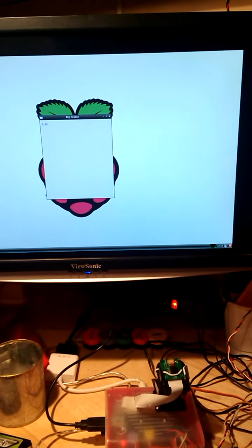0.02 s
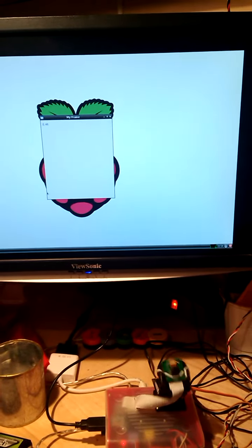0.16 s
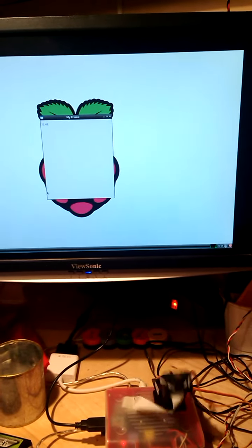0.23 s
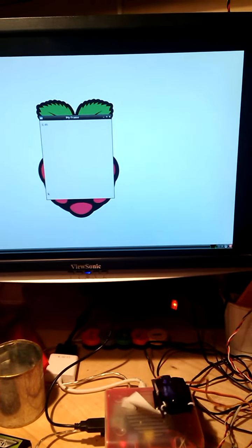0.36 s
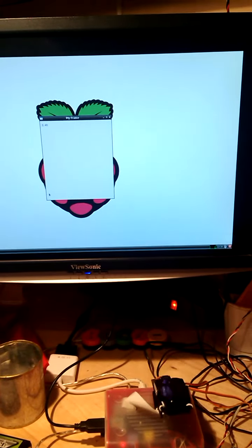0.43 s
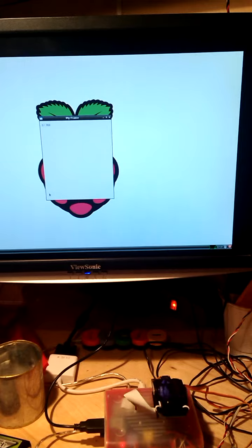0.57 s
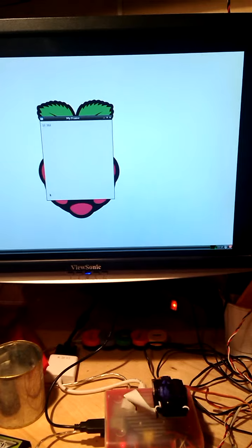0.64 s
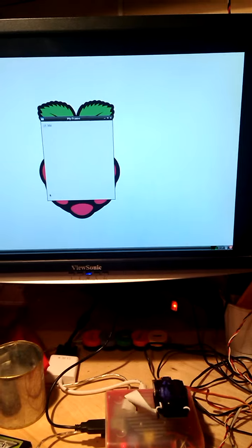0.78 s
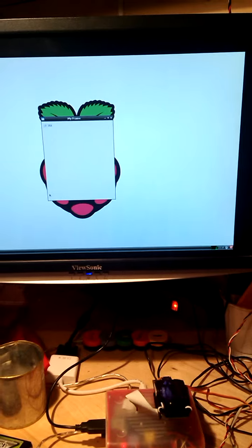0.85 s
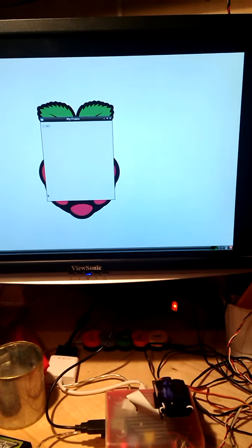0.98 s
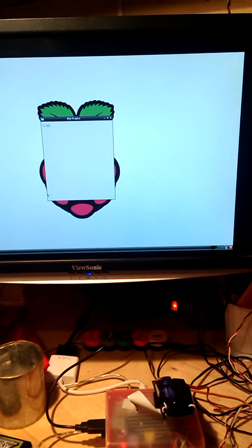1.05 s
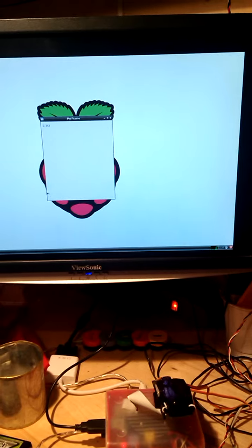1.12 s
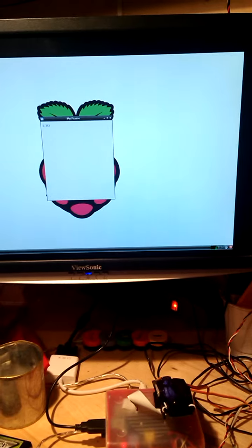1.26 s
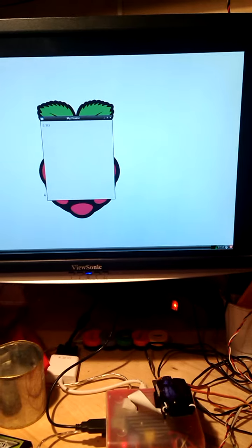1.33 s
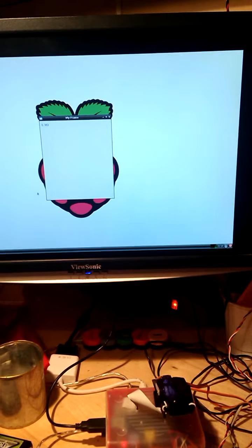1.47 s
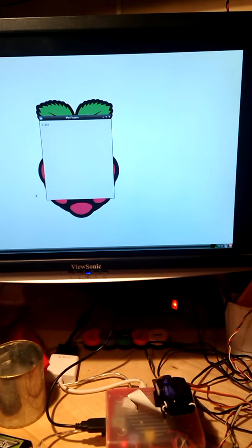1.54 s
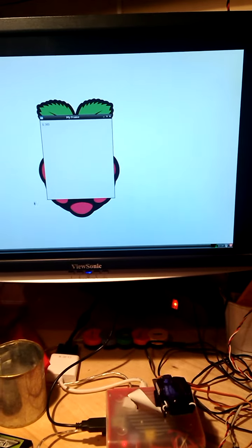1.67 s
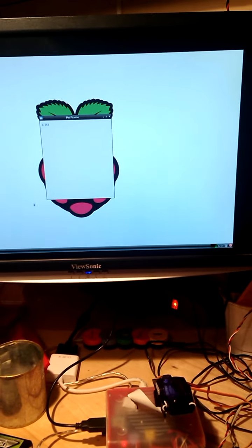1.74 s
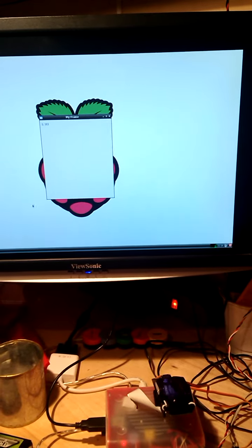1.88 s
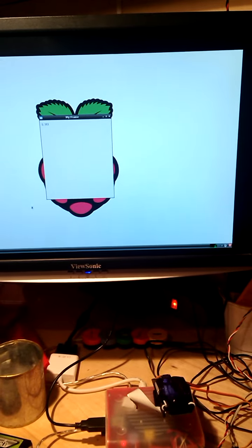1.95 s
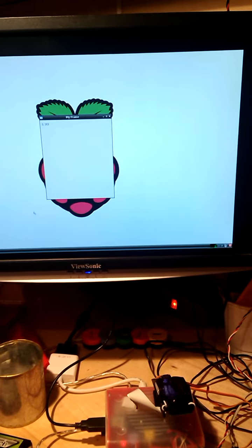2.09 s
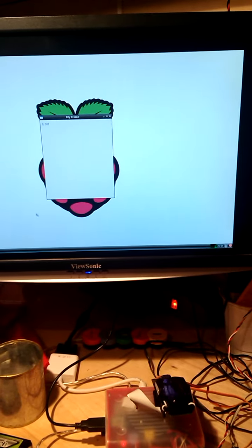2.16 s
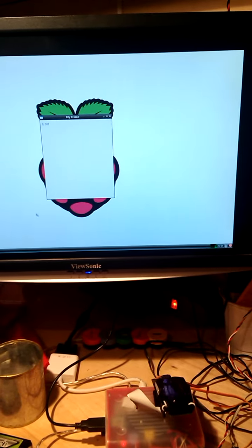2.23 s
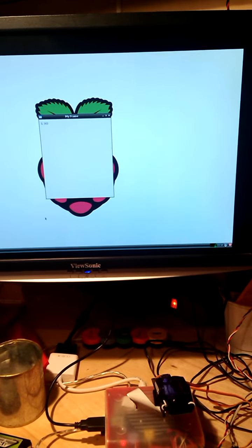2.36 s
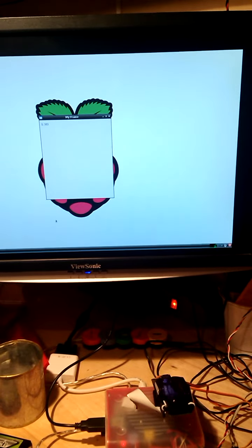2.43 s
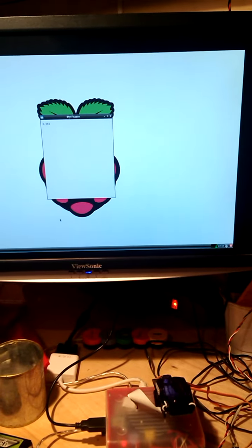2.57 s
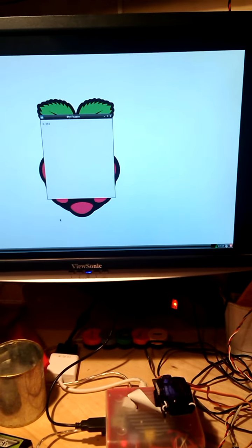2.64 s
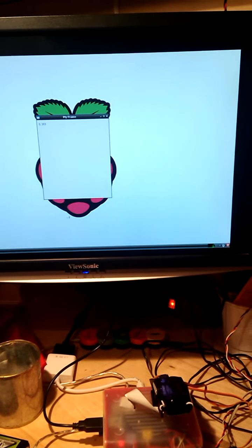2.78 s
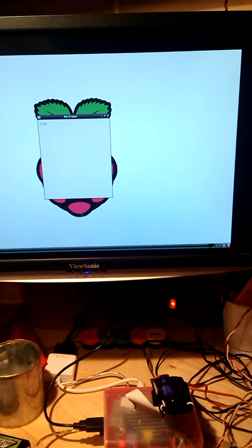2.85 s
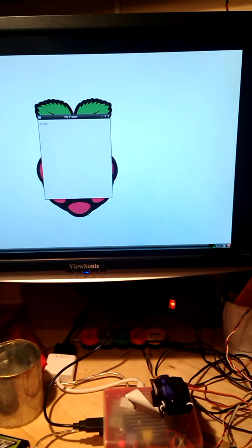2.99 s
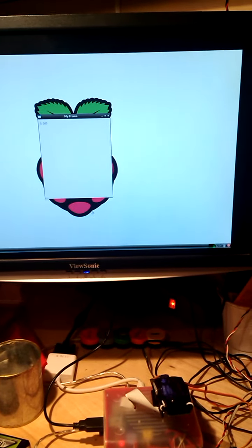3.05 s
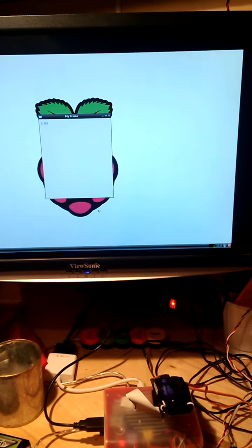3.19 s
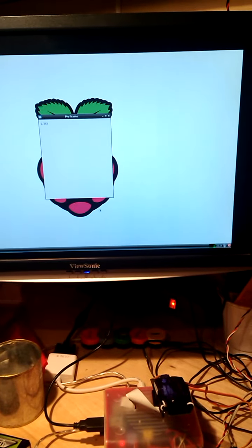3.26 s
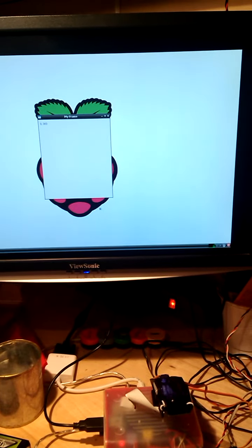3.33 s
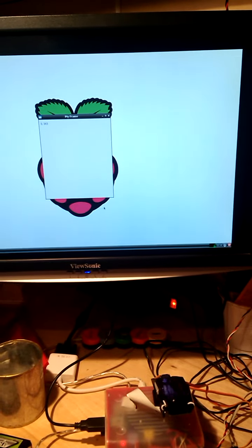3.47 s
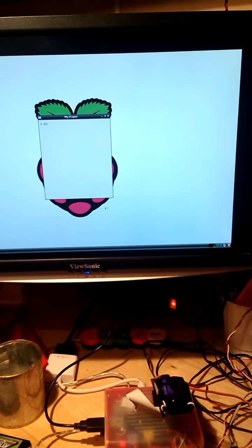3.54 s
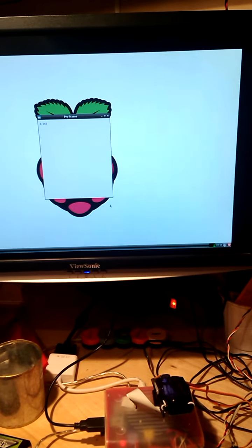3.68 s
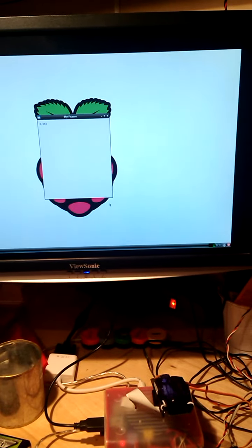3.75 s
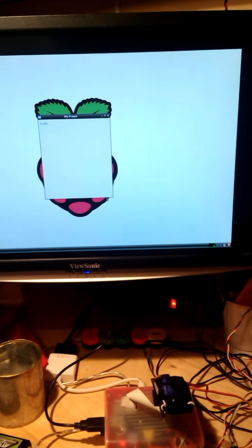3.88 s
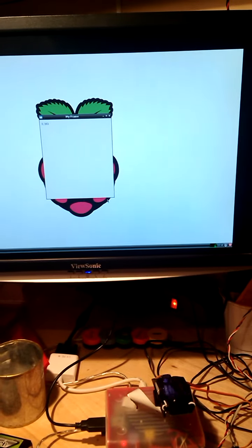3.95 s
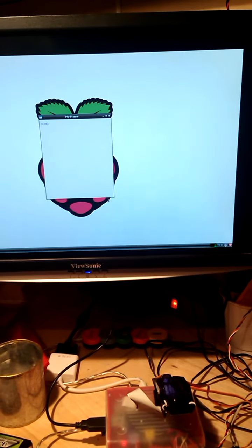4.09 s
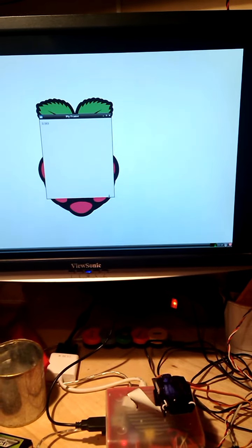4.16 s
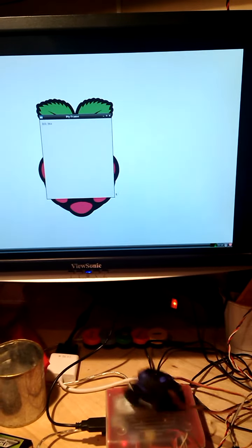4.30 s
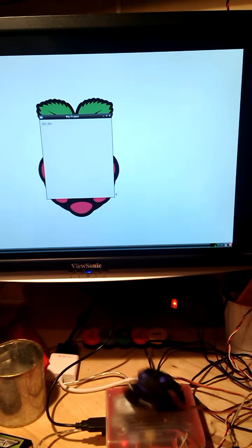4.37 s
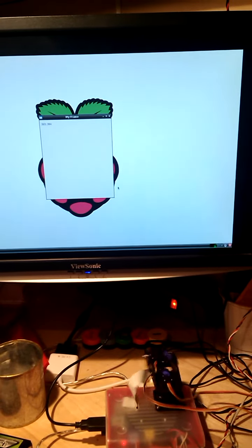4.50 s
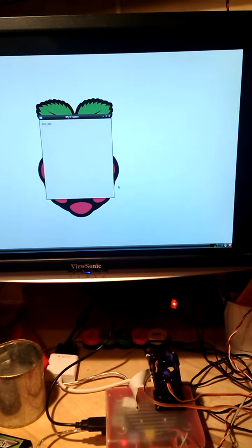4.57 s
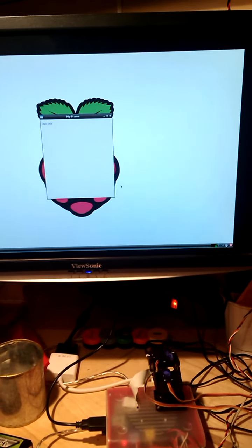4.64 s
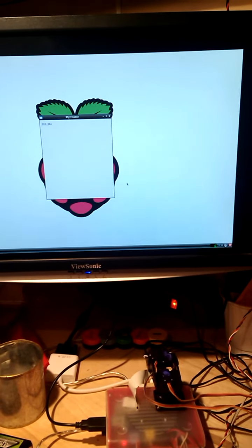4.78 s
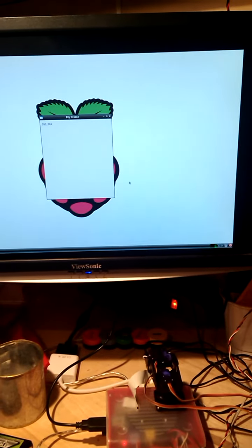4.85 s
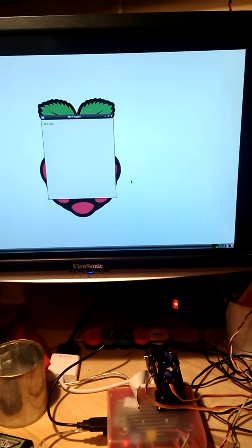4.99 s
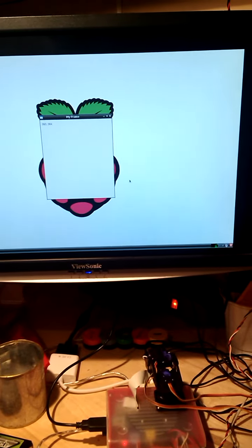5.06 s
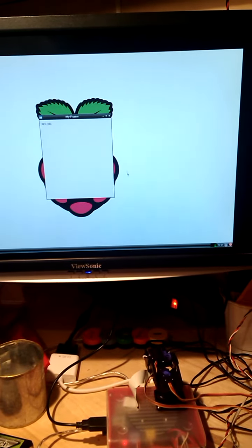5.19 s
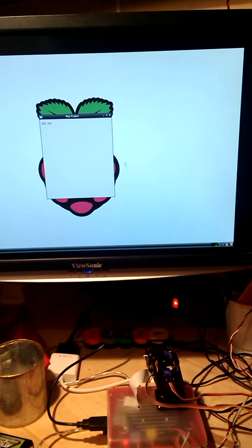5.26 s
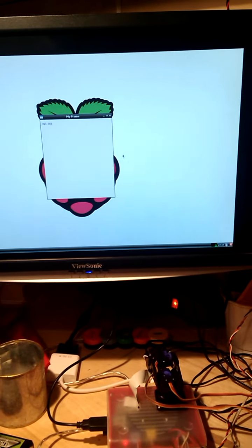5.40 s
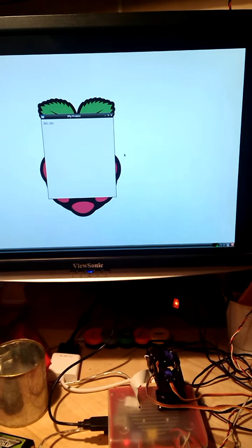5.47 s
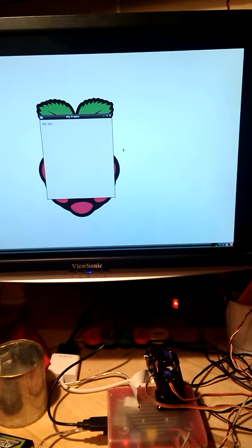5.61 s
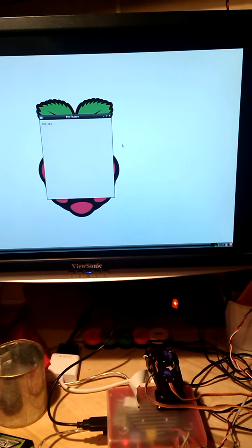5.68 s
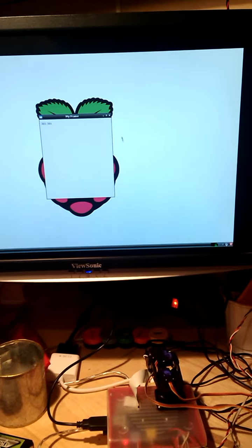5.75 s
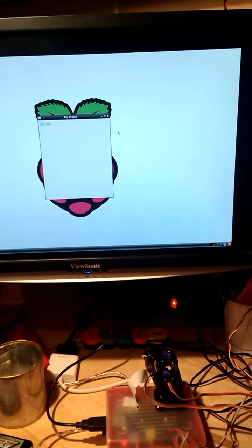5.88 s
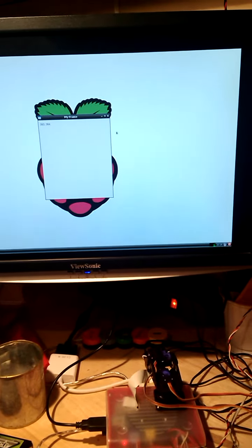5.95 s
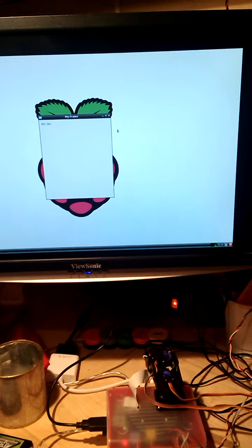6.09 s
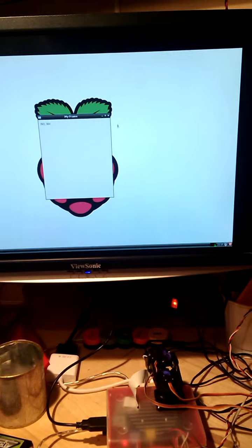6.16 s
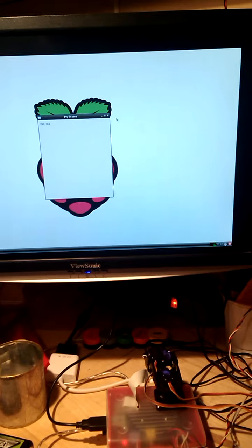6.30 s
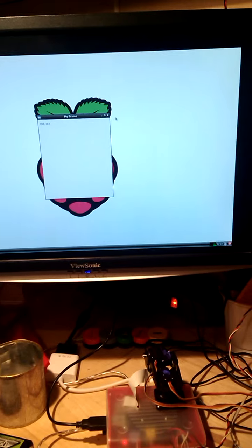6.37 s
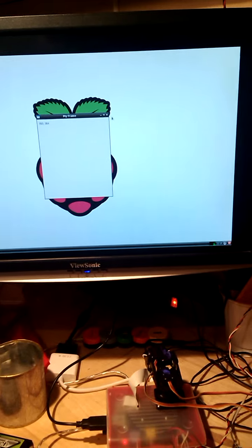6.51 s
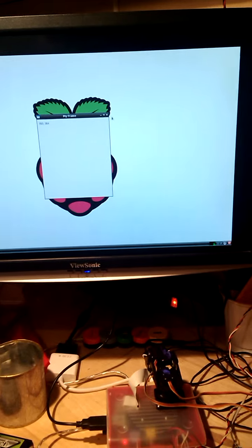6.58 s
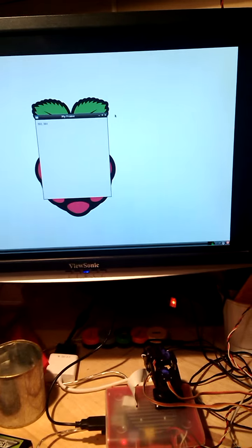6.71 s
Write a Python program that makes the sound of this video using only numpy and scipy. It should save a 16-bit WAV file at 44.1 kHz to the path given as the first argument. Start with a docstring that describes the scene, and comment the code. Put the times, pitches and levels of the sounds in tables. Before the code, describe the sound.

Close to a desk in a small damped room, steady microphone hiss opens alone. A small servo rasps briefly with chattering plastic gears, then ticks and twitches weakly. Faint sliding and a cluster of hollow knocks follow, then one sharp loud knock. A second servo run bursts out louder and harsher, twitches in turn, and a few separate knocks finish.

```python
"""A desk top in a small damped room, a hissing microphone close by: the hiss comes first and never stops.
From 0.24 s a small plastic-geared servo swings a bracket: teeth chatter in the case, the motor whines, the base thumps.
It then hunts for its position in short twitches; from 1.3 s something hard and hollow is slid, knocked and set
down, noise and sharp pushes ringing the desk. At 4.3 s a second servo makes a harder run and hunts in its turn.
A few last knocks and faint slides on the desk close the take."""
import sys
import numpy as np
from scipy import signal
from scipy.fft import rfft, irfft, next_fast_len
from scipy.io import wavfile
from scipy.ndimage import uniform_filter1d, map_coordinates

SR = 44100
rng = np.random.default_rng(int(sys.argv[2]) if len(sys.argv) > 2 else 0)


def wav_record(signal):
    """Record a signal, one row per channel, as 16-bit PCM in the file named by sys.argv[1]."""
    frames = np.transpose(np.atleast_2d(signal))
    bounded = np.clip(frames, -1, 1)
    # unit amplitude maps onto the largest positive 16-bit level
    quanta = np.round(bounded * 32767).astype(np.int16)
    wavfile.write(sys.argv[1], SR, quanta)


N = 296777

# Levels in the tables are relative: most sources add a fixed gain of their own further down.
# room and microphone noise: (f/Hz, density level/dB)
HISS = [(12, -26.5), (20, -16.5), (22, -9.5), (43, -22.5), (113, -18.5), (146, -30), (210, -22.5),
        (270, -28), (410, -24), (558, -31.5), (607, -29.5), (1150, -30.5), (1610, -34), (5380, -38.5),
        (16000, -42.5)]
HISS_DB = -56  # rms level
# the two full runs: (t/s, whirr level/dB, dull side of the case level/dB re whirr, treble lift/dB)
RUNS = [
    [(.242, -54, -4, 0), (.25, -25.5, -9, 7), (.264, -21.5, -15, 11), (.36, -19, -15.5, 9.5),
     (.43, -15, -15.5, 6.5), (.46, -13.5, -22, 3), (.478, -19.5, -13, 1), (.51, -45, 0.5, -4)],
    [(4.293, -40.5, -9, -6.5), (4.302, -17.5, -5.5, -1.5), (4.36, -13.5, -7, 3), (4.41, -16.5, -3, 8.5),
     (4.445, -24.5, -7, 11), (4.46, -15.5, -10, 4.5), (4.534, -12, -17, 2.5), (4.6, -20.5, -8, 3.5),
     (4.626, -31.5, -6, 4), (4.645, -22, -2, 7.5), (4.675, -46, -11, 0)],
]
# motor spells: (power on t/s, power off t/s, top speed f/Hz in turns, commutator whine level/dB)
MOTOR_SPELLS = [(0.244, 0.459, 112, -64), (4.293, 4.565, 103.2, -51)]
START_SHARE = .6  # speed at first sound over top speed
SPIN_UP_S, COAST_S = 0.031, 0.17  # time constants
WHINE_POWER = 4  # the whine grows as this power of speed
# take-ups of gear backlash, loud and faint: (t/s, peak level/dB)
JERKS = [(0.257, -19), (0.283, -9.5), (0.3285, -24.5), (0.367, -14), (0.403, -9), (0.4209, -17),
         (0.437, -13), (0.4667, -11), (0.4972, -22), (0.518, -24), (0.587, -22), (0.607, -15.5),
         (0.6264, -23), (0.6458, -29), (0.656, -19), (0.6978, -27.5), (0.7176, -29), (0.7566, -29),
         (0.838, -28.5), (0.862, -24.5), (0.897, -24.5), (0.911, -21.5), (0.9663, -23.5), (1.05, -32),
         (1.0969, -28), (1.1169, -24.5), (1.1357, -21.5), (1.166, -31), (1.1767, -23), (4.303, -3),
         (4.3166, -5), (4.3267, -5), (4.3479, -2.5), (4.3782, -1), (4.4058, -4), (4.465, -6.5), (4.485, -8),
         (4.5106, -3), (4.5323, -6), (4.559, -6.5), (4.594, -13), (4.6078, -18), (4.637, -19),
         (4.6738, -31), (4.688, -23), (4.7183, -29.5), (4.7562, -28), (4.7779, -22.5), (4.8163, -21.5),
         (4.8265, -22), (4.8754, -37), (4.887, -36), (4.958, -25.5), (4.9723, -28)]
JERK_T60_S, TICK_T60_S = 0.034, .008
TURN_JOLT_DB, TURN_SCATTER_DB = -2.5, 1.5  # one more take-up each shaft turn, re whirr; its spread
# resonances of the case: (f/Hz, width/Hz, level/dB over the case colour)
CASE_MODES = [(4540, 170, -0.5), (5030, 100, 0.5), (5700, 102.8, 4.5), (6150, 240, 1), (6530, 420, 0.5),
              (6900, 34, 3), (7120, 59, -1.5), (8000, 60, -0.5), (8420, 120, -12), (9300, 200, -1)]
# two curves, the case of each servo radiating, first mover and second: (f/Hz, density level/dB)
CASE_COLOURS = [(2120, -41), (3600, 5), (3810, -6), (4540, -14.5), (5140, -12), (5430, -9), (5860, -11.5),
                (6350, -4), (7150, -2.5), (8150, -10.5), (9650, -13.5), (10800, -23.5), (12200, -23),
                (14900, -26.5), (16000, -33)], [(2120, -55), (3600, -8.5), (3900, -13), (4830, -15.5),
                (5570, -6.5), (5930, -8.5), (6600, -1.5), (7520, -5), (8470, -9.5), (9960, -11),
                (10900, -20.5), (12000, -15), (13900, -18.5), (15400, -21.5), (16000, -26.5)]
SECOND_S = 3  # from here the second servo is the one moving
# ring of the output arm: (f/Hz, width/Hz, level/dB)
ARM = [(2505, 150, 0)]
# gears felt through the bracket: (f/Hz, density level/dB)
GROWL = [(150, -49.5), (250, -12), (387, -13), (511, -12), (568, -4.5), (734, 4), (959, 1), (1040, -5.5),
         (1140, -6.5), (1840, 1), (2070, 0), (3200, -8.5), (4160, -33.5), (7040, -120)]
GROWL_DB, GROWL_GROWS = -44.5, 0.78  # growl at a whirr of -19 dB; dB gained per dB of whirr
# short hunting twitches: (start t/s, length t/s, whirr level/dB)
TWITCHES = [(0.513, 0.06, -36.5), (.595, .03, -31.5), (0.637, 0.032, -35.5), (.696, .035, -47),
            (0.834, .08, -41.5), (0.969, 0.015, -33), (1.034, 0.036, -45), (1.096, 0.049, -43.5),
            (1.15, 0.02, -36.5), (4.672, 0.023, -36), (4.713, 0.018, -38.5), (4.772, 0.066, -36),
            (4.871, 0.053, -43.5), (4.96, 0.016, -36)]
TWITCH_RISE_S, TWITCH_T60_S, TWITCH_DULL_DB = .004, 0.087, -5.5
FIZZ_DB, FIZZ_GROWS = 4, .3  # lift of a twitch's treble at a whirr of -23 dB; dB gained per dB of whirr
# the bracket thumps its base: (t/s, peak level/dB)
THUMPS = [(0.265, -30), (0.47, -22.5), (4.38, -7.5), (4.419, -18), (4.61, -30), (4.704, -33.5)]
# the shaken base hums in swells: (middle t/s, half length t/s, f/Hz, glide/Hz per s, level/dB)
HUMS = [(0.309, 0.051, 92, 145, -54), (.4, 0.021, 150, 699, -60), (0.483, 0.019, 80, -300, -53),
        (4.438, 0.041, 97, 0.5, -54.5), (4.575, 0.016, 115, -2, -55)]
# resonances of the hollow base: (f/Hz, width/Hz, level/dB)
BASE = [(100, 110, -16), (304, 250, -19.5), (816, 88, 6), (890, 78, 3.5), (1070, 73, -12.5),
        (1440, 80, -4.5), (1740, 60, -7), (2130, 93, 0), (2540, 34, 0), (3000, 130, -11), (5300, 730, -8)]
# strokes of sliding over the desk: (middle t/s, half length t/s, level/dB, hiss level/dB re stroke)
SLIDES = [(1.302, 0.12, -60, -2.5), (2.173, 0.03, -58.5, 0), (2.294, 0.021, -51.5, -12),
          (2.351, .015, -43.5, -13), (2.4, 0.013, -43.5, -9), (2.429, 0.015, -39.5, -6.5),
          (2.601, 0.034, -60.5, 2), (2.8, 0.19, -66, 1.5), (3.185, 0.026, -65, -4),
          (3.353, 0.043, -60, -2.5), (3.573, .04, -61, -4), (5.093, 0.029, -56.5, -3),
          (5.48, 0.061, -60, 1), (6.112, .04, -66.5, -1), (6.38, .06, -67, 0)]
# resonances of the desk: (f/Hz, width/Hz, level/dB)
DESK = [(89.5, 150, -14.5), (225, 34, -5), (373, 50, 2.5), (589, 86, -8.5), (938, 145, -2), (1156, 110, 1),
        (1386, 100, 2.5), (1462, 150, 1.5), (1594, 69, -4), (1694, 99.2, -8.5), (1866, 118, -1.5),
        (2214, 120, -7.5), (2560, 210, -10), (3480, 200, -1), (4170, 740, -6), (4660, 220, -2),
        (5300, 270, -0.5), (5925, 250, 1), (6640, 200, -0.5), (7620, 500, -13), (8540, 500, -10),
        (10200, 1700, -20.5), (13500, 3000, -38)]
# where the desk's boom, hollow, body and tick lie: (low f/Hz, high f/Hz)
DESK_BANDS = [(0, 700), (700, 1300), (1300, 3000), (3000, SR)]
# knocks on the desk: (t/s, peak level/dB, then level/dB re peak: boom, hollow, tick, first strike)
KNOCKS = [(2.2907, -31, -16, -2, -12, 1.5), (2.3382, -27.5, -15, -5, -16, -2),
          (2.379, -33, -21, -11, -16, 1), (2.4006, -40, -20, -6, -8, 2), (2.4198, -24.5, -12, 1, -10, -11),
          (2.527, -37, -4, -1, -22, -3), (2.538, -18, -9.5, -2.5, -5.5, -12), (2.542, -24, -4, 8.5, -6, 1),
          (3.813, -5.5, -15.5, -6.5, -11, 2.5), (3.821, -30.5, -18, -21, -23, -7),
          (3.911, -33.5, -11, -10, -22, -5), (3.967, -36, 4, -2, -10, 3), (3.9747, -44.5, 1.5, 8.5, -9, -1),
          (4.0323, -35.5, 1, 5, -11, -3), (4.0372, -33.5, -10, -0.5, -7, -8),
          (5.3176, -12.5, -10.5, -4, -16.5, 3.5), (5.4172, -25, -6, -2, -10, -1),
          (5.422, -34.5, -20, 5, -5, -7), (5.9596, -25, -1.5, 3.5, -16, -1),
          (6.0011, -19.5, -10, -7, -10.5, -4.5), (6.0078, -36, -11, 2.5, -20, 9.5)]
CHATTER_T60_S = 0.048
# first clack of the knocked shell: (f/Hz, width/Hz, level/dB)
CLACK = [(1560, 360, 3.5)]
# decay of the room: (f/Hz, t60/s)
ROOM = [(200, 0.33), (600, 0.14), (1500, .14), (5000, .13), (12000, .09)]
TOP_HZ, OFFSET = 15900, -.0094  # band limit; steady offset, full scale 1


def amp(db):
    """Gain of a level in dB."""
    return 10 ** (np.asarray(db) / 20)


def unit(x):
    """Scaled to rms 1."""
    return x / np.sqrt(np.mean(x ** 2) + 1e-20)


def along(points, hz):
    """(Hz, value) points read on a log axis."""
    f, v = np.transpose(points)
    return np.interp(np.log(hz + 1), np.log(f + 1), v)


def curves(tables):
    """One value per sample for each column, and a mask that is 1 while a table lasts."""
    s, *cols = np.transpose(np.vstack(tables))
    t = np.arange(N) / SR
    on = sum((t >= rows[0][0]) & (t < rows[-1][0]) for rows in tables) > 0
    return [np.interp(t, s, c) for c in cols], uniform_filter1d(on * 1., size=100)


def filtered(x, response):
    """x times a response of frequency."""
    m = next_fast_len(N + SR // 2)
    return irfft(rfft(x, m) * response(np.fft.rfftfreq(m, 1 / SR)), m)[..., :N]


def ringing(modes):
    """Causal response of a set of resonances, alternating in sign."""
    def one(f, centre, width, db):
        return amp(db) * 1j * f * width / (centre * centre - f * f + 1j * f * width)
    return lambda f: sum((-1) ** k * one(f, *mode) for k, mode in enumerate(modes))


def wobble(rate):
    """A smooth random curve, rate knots a second."""
    knots = rng.standard_normal(int(N * rate / SR) + 4)
    return map_coordinates(knots, [np.arange(N) * rate / SR])


def swell(middle, half):
    """A bell-shaped rise and fall."""
    return np.exp(-.5 * ((np.arange(N) / SR - middle) / half) ** 2)


def contacts(clumps_per_s, spread_db):
    """Dense tiny impacts that come in harder and softer clumps."""
    return unit(rng.standard_normal(N) * amp(spread_db * wobble(clumps_per_s)))


def bursts(events, rise_s=0):
    """Envelope of (s, dB, t60) events: a quick start, then an exponential fall."""
    out, t = np.zeros(N + SR), np.arange(1, SR // 5) / SR
    rise = 1 - np.exp(-t / max(rise_s, 1e-6))
    for s, db, t60 in events:
        out[round(s * SR):][:len(t)] += amp(db - 60 * t / max(t60, .004)) * rise
    return out[:N]


def steady_hiss():
    """Room and microphone noise: steady random noise coloured by one spectrum."""
    return amp(HISS_DB) * unit(filtered(rng.standard_normal(N), lambda f: amp(along(HISS, f))))


def effort():
    """Whirr level of runs and twitches together, how much of the dull side shows, and the treble lift."""
    (run_db, dull_db, fizz_db), on = curves(RUNS)
    t, gain = np.arange(N) / SR, on * amp(run_db)
    for s, length, db in TWITCHES:
        rise = np.clip((t - s) / TWITCH_RISE_S, 0, 1)
        gain = gain + rise * amp(db - 60 * np.clip(t - s - length, 0, 1) / TWITCH_T60_S)
    whirr_db = 20 * np.log10(gain + 1e-9)
    twitch_fizz_db = FIZZ_DB + FIZZ_GROWS * (whirr_db + 23)
    under_db = on * dull_db + (1 - on) * TWITCH_DULL_DB
    return whirr_db, under_db, on * fizz_db + (1 - on) * twitch_fizz_db


def shaft():
    """The motor spins up, holds, and coasts down: turns a second and whine gain."""
    t, turns_hz, whine = np.arange(N) / SR, np.zeros(N), np.zeros(N)
    for start, stop, top_hz, db in MOTOR_SPELLS:
        up = 1 - (1 - START_SHARE) * np.exp(-np.clip(t - start, 0, 9) / SPIN_UP_S)
        coast = np.exp(-np.clip(t - stop, 0, 9) / COAST_S) * (t < stop + COAST_S / 2)
        share = (t > start) * up * coast
        turns_hz = turns_hz + top_hz * share
        whine = whine + amp(db) * share ** WHINE_POWER
    return turns_hz, uniform_filter1d(whine, size=400)


def strands(x, depth_db):
    """Narrow bands of the rattle or growl swell and fade at random."""
    z = signal.stft(x, nperseg=512)[2]
    field = uniform_filter1d(rng.standard_normal(z.shape), size=2, axis=0)
    field = uniform_filter1d(field, size=7, axis=1)
    return unit(signal.istft(z * amp(depth_db * unit(field)), nperseg=512)[1][:N])


def through_case(x):
    """Impacts coloured by the case of whichever servo is moving."""
    def ring(f):
        too_small_to_radiate_lower = 1 + (4150 / (f + 1)) ** 18
        return (1 + np.abs(ringing(CASE_MODES)(f))) / too_small_to_radiate_lower
    first, second = [unit(filtered(x, lambda f: amp(along(case, f)) * ring(f))) for case in CASE_COLOURS]
    return np.where(np.arange(N) < SECOND_S * SR, first, second)


def backlash(whirr_db, turn):
    """(s, dB) take-ups of slack in the gears: those listed, and one more each shaft turn, near the whirr's level."""
    luck = rng.standard_normal(200)
    each = np.flatnonzero(np.diff(turn // (2 * np.pi)))
    per_turn = [(k / SR, whirr_db[k] + TURN_JOLT_DB + TURN_SCATTER_DB * z) for k, z in zip(each, luck)]
    return list(JERKS) + per_turn


def gear_rattle(whirr_db, turns_hz, turn, jerks):
    """Gear teeth chatter, harder once a turn of the shaft, and every take-up jolts the case."""
    runout = 1 + .5 * (turns_hz > 0) * np.cos(turn + 1.2 * wobble(37))  # the pinion runs a little off centre
    teeth = through_case(strands(contacts(450, spread_db=2.0), depth_db=3))
    jolts = through_case(strands(contacts(700, spread_db=-0.5), depth_db=4.5))
    ticks = through_case(rng.standard_normal(N))  # each take-up opens with a dry tick
    jolt_gain = amp(-6.5) * bursts([(s, db, JERK_T60_S) for s, db in jerks], rise_s=0.0013)
    tick_gain = amp(-12.5) * bursts([(s, db, TICK_T60_S) for s, db in jerks])
    return runout * amp(whirr_db - 7.0) * teeth + jolt_gain * jolts + tick_gain * ticks


def case_balance(rattle, under_db, fizz_db, turns_hz):
    """The treble lifts and falls; the turning bracket shows or hides the duller side of the case."""
    bright = amp(np.clip(fizz_db, -20, 12))
    top = filtered(rattle, lambda f: 1 / (1 + (10500 / (f + 1)) ** 12))
    facing = amp(np.clip(under_db + 12.5, -12, 12))
    under = filtered(rattle, lambda f: 1 / (1 + (f / 5600) ** 12))
    # the lowest ring of the case is full only while the motor turns in a run
    deep = filtered(rattle, lambda f: 1 / (1 + (f / 4300) ** 24))
    resting = 1 - uniform_filter1d((turns_hz > 0) * 1., size=800)
    held_back = np.clip(.7 * resting, 0, 1) * facing * deep
    return rattle - held_back + (bright - 1) * top + (facing - 1) * under


def gear_growl(whirr_db):
    """Gear contacts felt through the bracket as a low growl, growing more slowly than the whirr."""
    grind = strands(contacts(200, spread_db=2.5), depth_db=3.5)
    growl = unit(filtered(grind, lambda f: amp(along(GROWL, f))))
    return amp(GROWL_DB + GROWL_GROWS * (whirr_db + 19)) * (whirr_db > -90) * growl


def motor_whine(turn, whine_gain):
    """Five commutator breaks a turn, unsteady, sound a tone and its octave."""
    waver = 5 * turn + .5 * wobble(45)
    tone = amp(3.3 * wobble(35)) * np.sin(waver)
    octave = .7 * amp(1.9 * wobble(30)) * np.sin(2 * waver)
    return amp(6.0) * whine_gain * (tone + octave)


def output_arm(jerks):
    """The output arm rings faintly at each take-up: noise through one resonance."""
    ring = unit(filtered(rng.standard_normal(N), ringing(ARM)))
    return amp(-34.0) * bursts([(s, db, JERK_T60_S) for s, db in jerks]) * ring


def servos():
    """Rattling gears ring the case and the arm, growl through the bracket; the motor whines."""
    whirr_db, under_db, fizz_db = effort()
    turns_hz, whine_gain = shaft()
    turn = 2 * np.pi * np.cumsum(turns_hz) / SR  # shaft angle in radians
    jerks = backlash(whirr_db, turn)
    rattle = gear_rattle(whirr_db, turns_hz, turn, jerks)
    gears = case_balance(rattle, under_db, fizz_db, turns_hz) + output_arm(jerks)
    return gears + gear_growl(whirr_db) + motor_whine(turn, whine_gain)


def base_thumps():
    """Short blows of noise ring the hollow base under the bracket."""
    blows = bursts([(s, db + 14, .012) for s, db in THUMPS])
    return filtered(blows * rng.standard_normal(N), ringing(BASE))


def base_hum():
    """The base hums while it is shaken: gliding sines in bell-shaped swells."""
    t, hum = np.arange(N) / SR, np.zeros(N)
    for s, half, hz, glide, db in HUMS:
        cycles = (hz + .5 * glide * (t - s)) * (t - s)
        hum = hum + amp(db) * swell(s, half) * np.sin(2 * np.pi * cycles)
    return amp(6.0 + 2.7 * wobble(26)) * hum


def desk_modes(lo, hi):
    """Response of the desk's resonances between two frequencies."""
    return ringing([m for m in DESK if lo < m[0] < hi])


def sliding():
    """Gritty friction drives the desk's resonances, each band by its own share."""
    slide = sum(amp(db) * swell(s, half) for s, half, db, _ in SLIDES) * amp(1.74 * wobble(25))
    hiss = sum(amp(db + hiss_db) * swell(s, half) for s, half, db, hiss_db in SLIDES)
    out = np.zeros(N)
    for (lo, hi), rub in zip(DESK_BANDS, [amp(-5) * slide, amp(-6.5) * slide, slide, hiss]):
        out = out + rub * unit(filtered(contacts(150, spread_db=2.0), desk_modes(lo, hi)))
    return out


def knocking():
    """Each knock is a sharp push and dying chatter: the shell clacks, the desk rings band by band."""
    s, peak_db, boom, hollow, tick, strike_db = np.transpose(KNOCKS)
    at = np.round(s * SR).astype(int)
    push = np.zeros(N)
    push[at] = amp(peak_db + strike_db + 24.5)
    out = filtered(push, lambda f: ringing(CLACK)(f) ** 2)  # the shell's heavily damped first clack
    for (lo, hi), knock_db in zip(DESK_BANDS, [boom + 15, hollow + 11, 9.2, tick + 11]):
        chatter = bursts(zip(s, peak_db + knock_db, s * 0 + CHATTER_T60_S))
        blows = chatter * contacts(600, spread_db=2.0)
        blows[at] += amp(peak_db + knock_db + strike_db + 17.0)  # the first strike is one sharp push
        out = out + filtered(blows, desk_modes(lo, hi))
    return out


def room(x):
    """Each frequency dies at its own speed; a new noise tail for each quarter second."""
    out, step = np.zeros(N + SR), SR // 4
    for k in range(0, N, step):
        hz, t, z = signal.stft(rng.standard_normal(SR // 3), SR, nperseg=256)
        decay = amp(-60 * t / along(ROOM, hz)[:, None])
        tail = signal.istft(z * decay, SR, nperseg=256)[1]
        wet = signal.fftconvolve(x[k:k + step], tail / np.linalg.norm(tail))
        out[k + 130:][:len(wet)] += wet  # the tail starts 130 samples late
    return out[:N]


def scene():
    """Servos and desk close by and in the room, over the hiss."""
    hiss = steady_hiss()
    gears = servos() + base_thumps() + base_hum()
    desk = sliding() + knocking()
    return (gears + desk + room(amp(-7.5) * gears + amp(-8.5) * desk) + hiss)[None]


def record(dry):
    """The highest peaks are gently rounded off; then a band limit and a small converter offset."""
    rounded = dry / (1 + np.abs(dry / .8) ** 4) ** .25
    return filtered(rounded, lambda f: 1 / (1 + (f / TOP_HZ) ** 160)) + OFFSET


dry = scene()
out = record(dry)
wav_record(out)
```